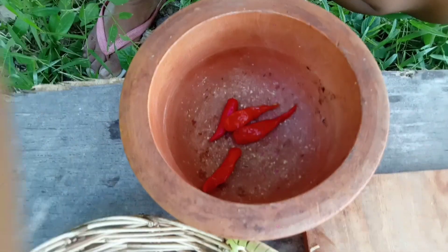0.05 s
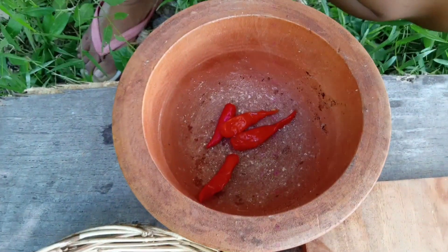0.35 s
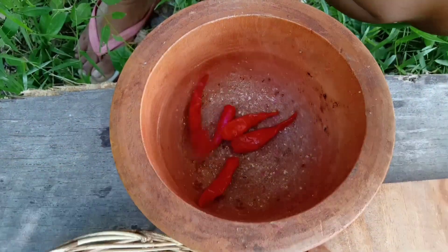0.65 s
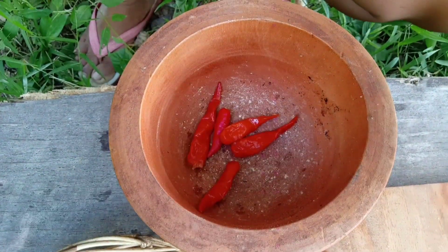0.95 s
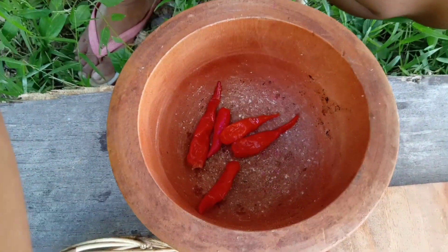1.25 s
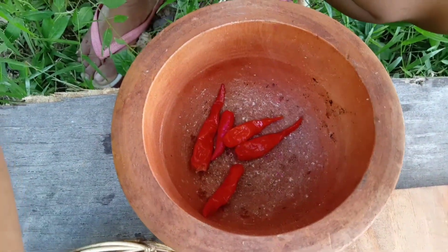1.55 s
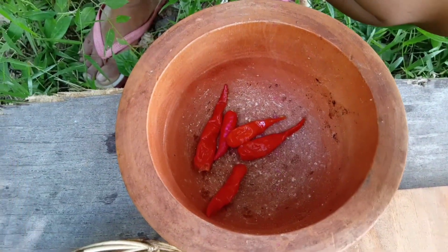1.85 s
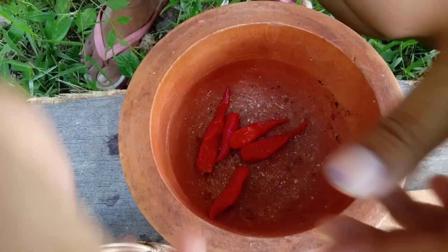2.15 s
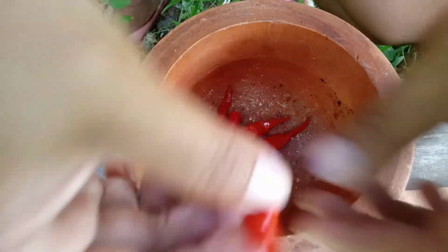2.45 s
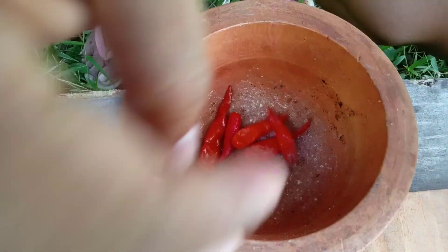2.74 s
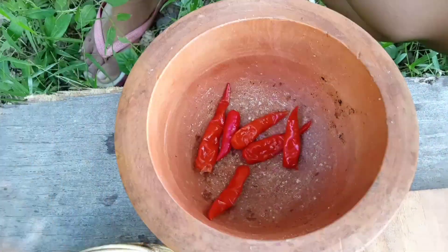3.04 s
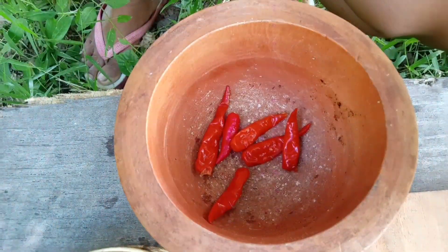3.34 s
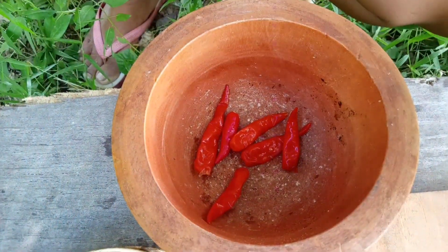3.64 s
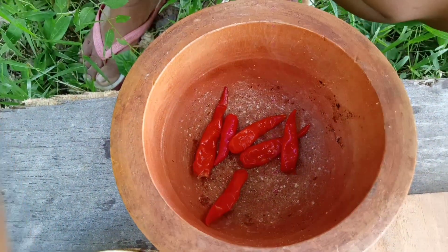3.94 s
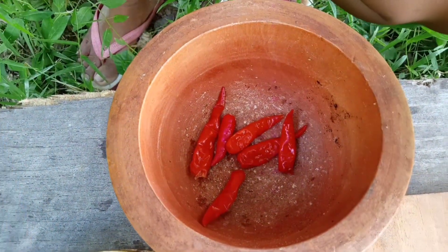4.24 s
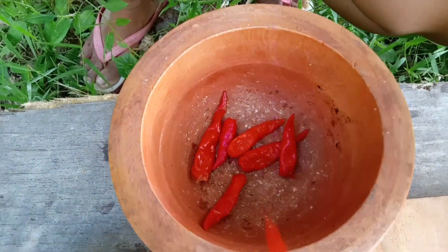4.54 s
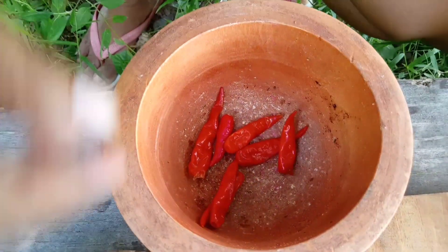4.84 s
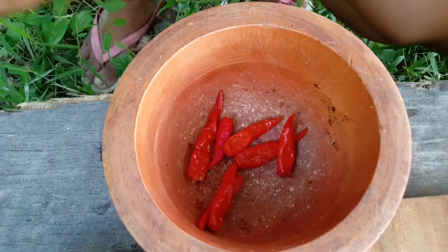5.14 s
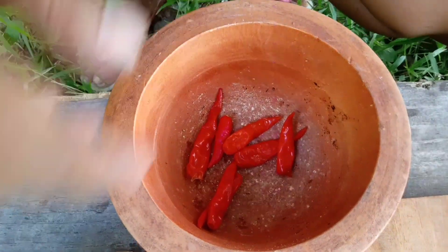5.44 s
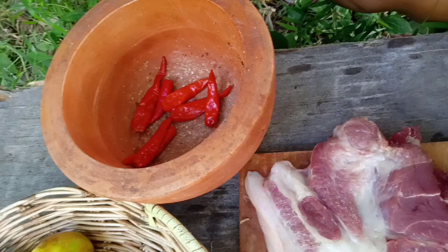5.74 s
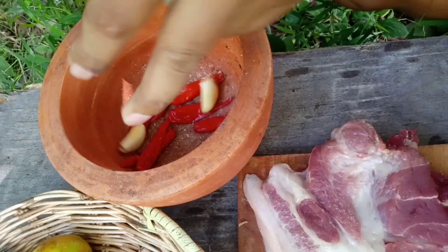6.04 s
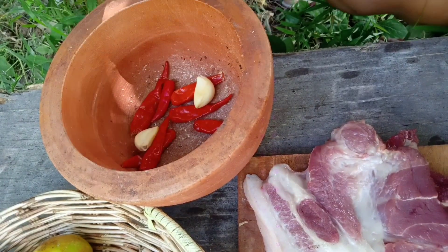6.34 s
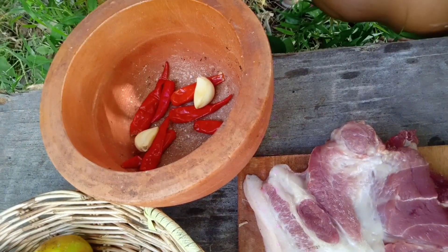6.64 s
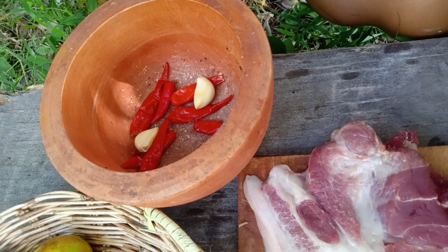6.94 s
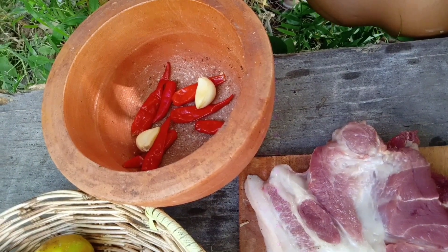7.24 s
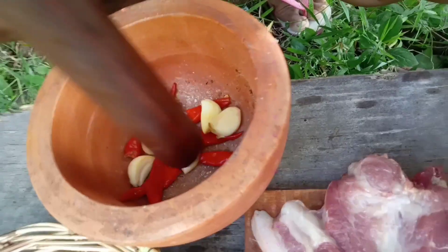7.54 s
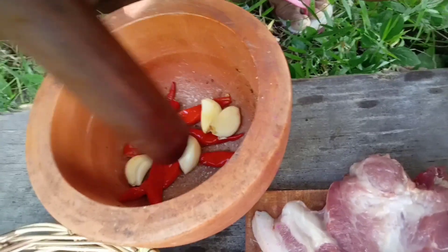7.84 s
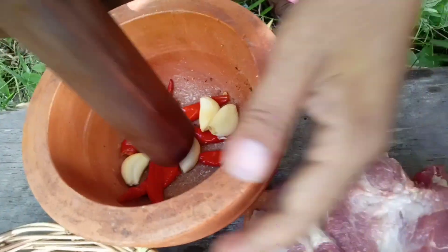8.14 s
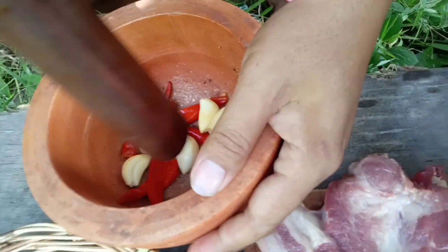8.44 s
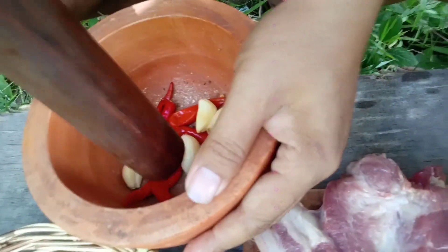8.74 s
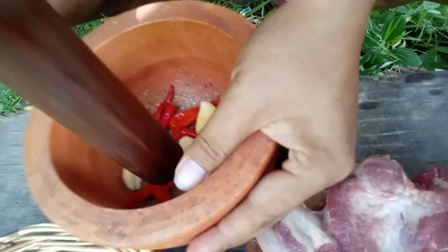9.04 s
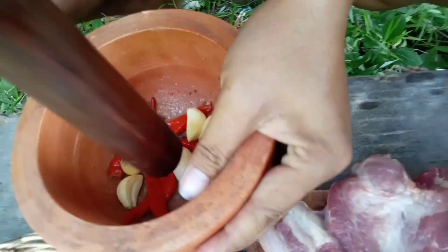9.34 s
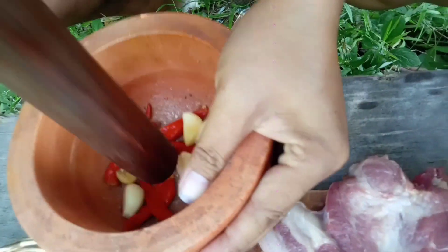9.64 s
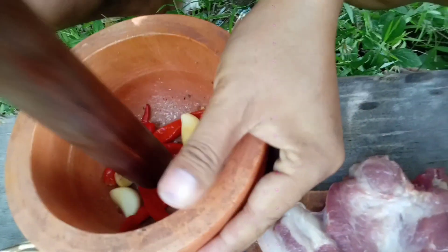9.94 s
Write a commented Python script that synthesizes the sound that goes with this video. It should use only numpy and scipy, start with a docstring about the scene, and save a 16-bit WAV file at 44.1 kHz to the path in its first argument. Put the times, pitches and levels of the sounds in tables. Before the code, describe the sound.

High, pulsing bird trills in a garden, a brief scrape and knock of a clay mortar, then close, regular pestle thumps.

```python
"""In a garden, chillies and garlic go into a clay mortar on a wooden bench. The mortar is dragged into
place, sticking and slipping, and a wooden pestle pounds the food: each blow makes the mortar boom and
the planks shake. Birds trill in double chirps, one whistles two notes twice, and others call far off,
over leaves and insects. Loud blows overload the close microphone, and its limiter (an automatic volume
control) turns the garden down for a moment."""
import sys
import numpy as np
from scipy import signal
from scipy.fft import rfft, irfft, next_fast_len
from scipy.io import wavfile
from scipy.ndimage import uniform_filter1d

SR = 44100
rng = np.random.default_rng(int(sys.argv[2]) if len(sys.argv) > 2 else 0)


def unload_audio(sound):
    """Save the sound as a 16-bit wav file, at the path given as the first command line argument."""
    columns = np.transpose(np.atleast_2d(sound))
    # keep every value between -1 and 1, then stretch to whole-number steps
    steps = np.round(np.clip(columns, -1, 1) * 32767)
    wavfile.write(sys.argv[1], SR, steps.astype(np.int16))


N = 440118
TIME = np.arange(N) / SR

# Modes, the tones a thing rings with when hit: pitch_hz, level_db, ring_s (time to fade by 60 dB)
BENCH_MODES = [(76, -12, 0.077), (100.9, 30, 0.12), (127, -6, 0.05)]
BOOM_MODES = [(155.6, 2, 0.11), (199, 4.5, 0.077), (247, -0.5, 0.067), (340, -8, 0.089),
              (412.6, -18, 0.098)]  # the mortar's hollow on its boards
KNOCK_MODES = [(567, -7, 0.037), (770, -1, 0.032), (880, -4, 0.025), (1151, -13, 0.034), (1344, -20, 0.019)]  # the mortar's hard knock
CLAY_MODES = [(1440, -10.5, 0.17), (2010, -31, 0.021), (2960, 12, 0.029), (3400, -3, 0.083)]  # the mortar's wall
# Noise colours, how strong the low and high parts are: pitch_hz, level_db
GARDEN_COLOUR = [(15, -43), (25, -7), (113, 4), (198, 1.5), (297, -4.5), (421, -11), (537, -12),
                 (1110, -14), (1900, -18.5), (3170, -15), (3440, -16), (5430, -30), (7300, -25),
                 (10600, -34), (15500, -20.5)]
CRACK_COLOUR = [(700, -2.5), (1200, -2), (2000, 1.5), (3000, 0), (4200, 0), (5500, -14), (8000, -14)]


def from_db(db):
    """Turn decibels into a number to multiply a sound by."""
    return 10 ** (np.asarray(db) / 20)


def unit_level(x):
    """Scale a sound so that its average level (rms) is 1."""
    return x / np.sqrt(np.mean(x ** 2) + 1e-20)


def in_time(rows, t=TIME):
    """Join the points of a table with straight lines; the first column is time."""
    times, *columns = np.transpose(rows)
    return [np.interp(t, times, column) for column in columns]


def add(out, start_s, sound):
    """Mix a sound in at its start time."""
    at = min(max(round(start_s * SR), 0), N)
    out[at:at + len(sound)] += sound[:N - at]


def fade(t, fade_in, fade_out):
    """A volume that rises, holds and falls; the fade lengths are in the same unit as t."""
    return np.clip(np.minimum(t / fade_in, (t[-1] - t) / fade_out), 0, 1)


def noise(colour, low_hz=20, high_hz=16500):
    """Steady noise of a given colour between a low and a high edge."""
    size = next_fast_len(N)
    hz = np.maximum(np.fft.rfftfreq(size, 1 / SR), 1)
    points_hz, db = np.transpose(colour)
    gain = from_db(np.interp(np.log(hz), np.log(points_hz), db))
    gain /= np.sqrt((1 + (low_hz / hz) ** 20) * (1 + (hz / high_hz) ** 20))
    return unit_level(irfft(rfft(rng.standard_normal(size)) * gain)[:N])


def tone(hz, waver, waver_hz):
    """A pure tone whose pitch wavers at random; waver is a share of the pitch."""
    wobble = np.interp(TIME[:len(hz)] * waver_hz, np.arange(SR // 20), rng.standard_normal(SR // 20))
    return np.sqrt(2) * np.sin(2 * np.pi * np.cumsum(hz * (1 + waver * wobble)) / SR)


def garden():
    """Five bands of noise swell slowly. From low to high: rumble, murmur, leaves, insects and hiss."""
    # How each band swells: time_s, level_db
    murmur_curve = [(0.0, -57), (1.55, -55), (1.75, -51), (2.11, -57), (4.81, -56.5), (5.37, -51.5),
                    (5.64, -58), (5.86, -48), (6.06, -52.5), (6.64, -55), (7.37, -48.5), (8.92, -49.5),
                    (9.09, -44.5), (9.98, -44.5)]
    leaf_curve = [(0.0, -55), (0.61, -54), (0.86, -51.5), (1.42, -51), (1.72, -48), (2.14, -56),
                  (4.75, -56.5), (5.31, -46), (5.58, -51.5), (6.87, -53), (7.06, -47.5), (7.37, -49),
                  (9.53, -47.5), (9.98, -48)]
    insect_curve = [(0.0, -58.5), (1.8, -54), (2.06, -59), (4.67, -59), (5.14, -53.5), (5.45, -53),
                    (5.61, -61), (5.86, -62.5), (6.06, -63.5), (6.75, -67), (7.09, -59), (8.26, -60),
                    (8.73, -59.5), (9.98, -57)]
    hiss_curve = [(0.0, -52.5), (1.88, -46.5), (2.14, -50), (3.57, -52.5), (5.4, -48.5), (5.58, -52),
                  (5.84, -51), (6.06, -50.5), (6.67, -54), (7.01, -50.5), (9.1, -50.5), (9.5, -52)]
    # Where the bands begin and end: edge_hz
    edges_hz = [20, 380, 1700, 5200, 11300, 16500]
    curves = murmur_curve, leaf_curve, insect_curve, hiss_curve
    murmur, leaves, insects, hiss = (in_time(curve)[0] for curve in curves)
    rumble = -42.5 + 0.85 * (murmur - murmur.mean())
    levels_db = [rumble, murmur + 2, leaves + 2, insects + 7.5, hiss + 4.5]
    bands = zip(levels_db, edges_hz, edges_hz[1:])
    return sum(from_db(db) * noise(GARDEN_COLOUR, low, high) for db, low, high in bands)


def insect():
    """One insect makes faint, high rasps that swell and fade."""
    # Rasps: start_s, length_s, level_db
    rasps = [(2.45, 0.22, -54), (2.883, 0.2, -53), (3.34, 0.21, -52), (3.83, .19, -52.5),
             (5.337, 0.19, -49)]
    level = np.zeros(N)
    for start_s, length_s, db in rasps:
        add(level, start_s, from_db(db) * np.hanning(int(length_s * SR)) ** .5)
    band = signal.butter(2, [10100, 10550], "band", fs=SR, output="sos")
    return level * unit_level(signal.sosfilt(band, rng.standard_normal(N)))


def among_trees(sound, echo_db, ring_s, count=300):
    """Trunks and leaves send back many small echoes, the later ones weaker."""
    delays_s = rng.uniform(.004, .45, count)
    echoes = np.zeros(SR // 2)
    echoes[(delays_s * SR).astype(int)] = rng.standard_normal(count) * from_db(-60 * delays_s / ring_s)
    return sound + from_db(echo_db) * signal.oaconvolve(sound, echoes / np.linalg.norm(echoes))[:N]


def far_calls():
    """Far birds sing thin or buzzy notes whose pitch bends in one arc."""
    # Calls: start_s, length_s, start_hz, middle_hz, end_hz, level_db, change_db, buzz (share of pitch)
    calls = [(0.771, 0.46, 4136, 3410, 3150, -36, -16.5, 0.011),
             (1.982, 0.1, 5900, 6620, 6750, -51.5, -3, 0.004),
             (2.299, 0.16, 5600, 6300, 7000, -55.5, -3, .005),
             (2.71, 0.18, 6450, 7520, 6500, -55.5, 7, 0.0038),
             (5.01, .32, 6280, 7600, 6760, -54, 7, 0.0061), (0.898, 0.046, 6500, 6120, 6000, -44, -6, .04),
             (3.658, 0.055, 6200, 5150, 2420, -39, -13, 0.027),
             (6.949, 0.03, 6400, 5700, 3500, -44.5, -1, .04),
             (8.679, 0.067, 7660, 7540, 7180, -31.5, 1, 0.038)]
    out = np.zeros(N)
    for start_s, length_s, start_hz, middle_hz, end_hz, db, change_db, buzz in calls:
        t = TIME[:int(length_s * SR)]
        arc = np.polyfit([0, .5, 1], [start_hz, middle_hz, end_hz], 2)
        level = from_db(db + change_db * t / length_s) * fade(t, 0.1 * length_s, .007)
        add(out, start_s, level * tone(np.polyval(arc, t / length_s), buzz, waver_hz=928))
    return out


def far_pips(every_s=.102, length_s=0.032, rise_share=0.145):
    """Far birds give short rising notes, alone or in even runs that grow louder."""
    # Runs: start_s, end_s, pitch_hz, level_db, swell_db_per_s
    runs = [(0.275, .82, 3087, -50, 20), (2.213, 2.25, 2960, -49, 0), (8.025, 8.06, 1967, -39.5, -3),
            (8.293, 8.33, 2110, -34, 0), (9.071, 9.53, 1868, -38, 20), (9.63, 9.655, 2120, -38, 0)]
    out, t = np.zeros(N), TIME[:int(length_s * SR)]
    for start_s, end_s, hz, db, swell in runs:
        for at_s in np.arange(start_s, end_s, every_s):
            note = tone(hz * (1 + rise_share * t / length_s), waver=0.048, waver_hz=392)
            add(out, at_s, from_db(db + swell * (at_s - start_s)) * fade(t, .007, .007) * note)
    return out


def trill(start_s, end_s, base_rate, base_hz, db, swell, fall_hz=378, chirp_s=0.0086):
    """A bird's pairs of falling chirps speed up, then slow down as it tires."""
    out = np.zeros(N)
    t = np.arange(0, end_s - start_s, 1 / SR)
    slow_start, tiring = 9.26 * np.exp(-t / .233), 3.76 * t
    pairs_per_s = base_rate - slow_start - tiring
    pairs_sung = np.cumsum(pairs_per_s) / SR
    pair_starts = np.searchsorted(pairs_sung, np.arange(pairs_sung[-1]))
    level_db = db + swell * t - 3.5 * np.exp(-np.minimum(t, t[-1] - t) / 0.048)  # softer at both ends
    for i in pair_starts[start_s + t[pair_starts] >= 0]:
        top_hz = base_hz + 28 * (pairs_per_s[i] - 23)  # a faster trill is also higher
        for delay_s, length_s, drop_hz in ((0, chirp_s, fall_hz), (0.011, chirp_s * 1.23, fall_hz * 0.7)):
            progress = np.linspace(0, 1, int(length_s * SR))
            pitch_chance, uneven_db = rng.standard_normal(2)
            hz = top_hz + 25 * pitch_chance - drop_hz * progress ** 1.87
            chirp = fade(progress, .17, .17) * np.sin(2 * np.pi * np.cumsum(hz) / SR)
            add(out, start_s + t[i] + delay_s, from_db(level_db[i] + uneven_db) * chirp)
    return out


def whistle(overtone_db=-40.5, waver=0.0081):
    """A bird whistles a falling and a rising note, twice, with a faint tone at three times the pitch."""
    # One list of points for each note: time_s, pitch_hz, level_db
    notes = [
        [(1.44, 2960, -37), (1.46, 2840, -21), (1.524, 2500, -31), (1.532, 2415, -23.5), (1.586, 2328, -24),
         (1.61, 2550, -28)],
        [(1.717, 2940, -37), (1.725, 2999, -31.5), (1.753, 3040, -17.5), (1.779, 3240, -24), (1.867, 3082, -14),
         (1.915, 3100, -30.5)],
        [(6.82, 2860, -44), (6.836, 2940, -29), (6.87, 2625, -19), (6.924, 2480, -15.5), (6.978, 2436, -15.5),
         (7.0, 2380, -35)],
        [(7.117, 2860, -38), (7.133, 2950, -22), (7.179, 3182, -11.5), (7.231, 3146, -10.5),
         (7.259, 3087, -17.5), (7.277, 3140, -23)],
    ]
    out = np.zeros(N)
    for note in notes:
        t = np.arange(note[0][0], note[-1][0], 1 / SR)
        hz, db = in_time(note, t)
        voice = tone(hz, waver, waver_hz=204.5) + from_db(overtone_db) * tone(3 * hz, waver, waver_hz=200)
        add(out, t[0], from_db(db) * fade(t - t[0], .007, .007) * voice)
    return out


def birds(cut_s=7.277):
    """Birdsong echoes among trees. At a cut, trills, whistles and their echoes end; far calls go on."""
    # Trills: start_s, end_s, base_pairs_per_s, base_pitch_hz, level_db, swell_db_per_s, echo_db
    bouts = [(-1.08, .255, 27, 5296, -34, 1, -7), (.511, 1.973, 27.14, 5296, -33, 1, -4),
             (2.378, 3.643, 26.69, 5296, -31, .3, -8), (3.856, 4.999, 27.27, 5296, -37.5, 6, -7),
             (5.68, 5.82, 28, 5330, -52, -50, 2), (5.68, 6.1, 22, 4850, -57, 8, 0),
             (6.28, 7.27, 26.5, 5300, -55, 10, 2), (6.62, 7.27, 22, 4850, -60, 7, 0)]
    trills = sum(among_trees(trill(*bout), echo_db, ring_s=.22) for *bout, echo_db in bouts)
    whistles = among_trees(whistle(), echo_db=-8.5, ring_s=0.46, count=120)
    calls = among_trees(far_calls(), echo_db=1.5, ring_s=0.48)
    pips = among_trees(far_pips(), echo_db=0, ring_s=0.45)
    before_cut = np.clip((cut_s - TIME) / 0.0023, 0, 1)
    return (from_db(-0.55) * trills + whistles) * before_cut + calls + from_db(-2) * pips


def struck(modes, contact_s, scatter_db=7.5, detune=0.015, ring_factor=1):
    """A short push sets a thing ringing, a little differently each time; longer pushes sound duller."""
    t = TIME[:SR // 5]
    ring = np.zeros(len(t))
    for k, (hz, db, ring_s) in enumerate(modes):
        level_chance, pitch_chance = rng.standard_normal(2)
        level = from_db(db + scatter_db * level_chance - 60 * t / (ring_s * ring_factor))
        ring += (-1) ** k * level * np.sin(2 * np.pi * hz * (1 + detune * pitch_chance) * t)
    push = np.sin(np.linspace(0, np.pi, max(int(contact_s * SR), 3)))
    ring = signal.fftconvolve(ring, push)[:len(t)]
    return ring / np.std(ring[:SR * 3 // 100])  # level 1 over the first 30 ms


def grainy(depth_db):
    """A volume that jumps from one millisecond to the next, as single fibres and grains break."""
    return from_db(depth_db * unit_level(uniform_filter1d(rng.standard_normal(N), size=40)))


def snaps(bursts, crack_db, fizz_db, clay_db, ring_s, grain_db, low_hz=300, rise_s=0.00035):
    """Bursts of tiny cracks die away quickly and set the clay wall ringing."""
    # The high fizz of a snap: pitch_hz, level_db
    fizz_colour = [(3500, -1), (5500, -2.5), (7600, 19.5), (10000, -7), (15000, -11.5)]
    level, clay = np.zeros((2, N))
    t = TIME[:SR // 6]
    for start_s, db in bursts:
        add(level, start_s, from_db(db - 60 * t / ring_s) * (1 - np.exp(-t / rise_s)))
        add(clay, start_s, from_db(db + clay_db) * struck(CLAY_MODES, contact_s=.0001, detune=0.00095))
    level *= grainy(grain_db)
    crack = from_db(crack_db) * noise(CRACK_COLOUR, low_hz)
    fizz = from_db(fizz_db) * noise(fizz_colour)
    return level * (crack + fizz) + clay


def blows(contacts, shudder_db, shudder_s, mash_db, mash_s=0.1):
    """Each contact thumps the bench and makes the mortar boom and knock; planks shudder, food mashes."""
    # Loose planks shuddering, and food being mashed: pitch_hz, level_db
    shudder_colour = [(50, -19), (90, -8), (160, 5), (230, 3.5), (320, -24), (450, -32), (800, -30),
                      (1500, -126)]
    mash_colour = [(250, -13), (450, 10.5), (800, 2), (1500, -5), (2600, -4), (4500, -31), (9000, -24)]
    out, shudder_power, mash_power = np.zeros((3, N))
    t = TIME[:SR // 2]
    for start_s, boom_db, bench_db, knock_db, ring_factor, contact_s in contacts:
        bench = struck(BENCH_MODES, contact_s=0.0058, scatter_db=13)
        boom = struck(BOOM_MODES, contact_s, scatter_db=4.5, detune=0.048, ring_factor=ring_factor)
        knock = struck(KNOCK_MODES, 0.00048, scatter_db=3.5, detune=0.029, ring_factor=ring_factor)
        for db, sound in (bench_db, bench), (boom_db, boom), (knock_db - 11, knock):
            add(out, start_s, from_db(db) * sound)
        shudder_level = from_db(boom_db + shudder_db - 60 * t / (shudder_s * ring_factor))
        mash_level = from_db(boom_db + mash_db - 60 * t / mash_s)
        add(shudder_power, start_s, shudder_level ** 2 * (1 - np.exp(-t / 0.0042)))
        add(mash_power, start_s, mash_level ** 2 * (1 - np.exp(-t / 0.0021)))
    shudder = np.sqrt(shudder_power) * noise(shudder_colour)
    mash = np.sqrt(mash_power) * noise(mash_colour) * grainy(depth_db=4)
    return out + shudder + mash


def handling():
    """The mortar is gripped, tipped and set down, garlic drops in, and food, grit and clay tick."""
    # Bumps: start_s, boom_db, bench_db, knock_db, clink_db, ring_factor, contact_s
    bumps = [(.681, -37, -53, -37, -62, 1.4, .001), (4.838, -24.5, -22.5, -68, -65, 4.4, 0.0069),
             (4.972, -10.5, -27, -31, -33.5, 1.3, 0.0059), (5.002, -32, -41, -34, -44, 6.6, 0.0017),
             (5.392, -12.5, -26, -12.5, -20.5, 1.5, 0.002), (5.404, -17, -33, -19, -31, 1.0, 0.0017),
             (5.436, -16, -23, -44, -23, 2.46, .0045), (5.585, -2, -35, -6.5, -18, 0.54, 0.00071),
             (5.604, -10, -39, -32, -42, 0.83, 0.00055), (5.636, -10, -35, -35, -26, 0.49, 0.0013),
             (5.876, -22.5, -62, -27.5, -43, 1.9, .0019), (5.976, -27, -57.5, -35, -52, 5, 0.003),
             (6.005, -26.5, -52, -20.5, -40, 2.4, 0.0012)]
    # Sharp, fizzy ticks and cracks of food, grit and clay: start_s, level_db
    ticks = [(0.3805, -30), (0.6494, -24), (0.6654, -10.5), (0.68, -6.5), (0.7764, -25), (1.2945, -28),
             (2.7736, -21), (3.0714, -31), (3.825, -21), (4.7142, -23.5), (5.436, -11.5), (5.8646, -26),
             (5.984, -24), (7.359, -8), (7.626, -14.5), (8.609, -11), (9.131, -22), (9.2219, -18),
             (9.864, -17)]
    contacts, clinks = [], []
    for start_s, boom_db, bench_db, knock_db, clink_db, ring_factor, contact_s in bumps:
        contacts.append((start_s, boom_db, bench_db, knock_db, ring_factor, contact_s))
        clinks.append((start_s, clink_db))
    return (blows(contacts, shudder_db=3, shudder_s=0.068, mash_db=-18.5)
            + snaps(clinks, crack_db=7.5, fizz_db=-4, clay_db=-5, ring_s=0.025, grain_db=4.5)
            + snaps(ticks, crack_db=-16, fizz_db=-10, clay_db=-45, ring_s=0.047, grain_db=2,
                    low_hz=1970, rise_s=0.00078))


def drag(slips_per_s=90):
    """The mortar's foot sticks and slips, grinding grit; each slip rings differently as contact moves."""
    # How hard the mortar is dragged: time_s, force_db
    force_curve = [(5.17, -38.5), (5.25, -18), (5.305, -13), (5.365, -15.5), (5.385, -53)]
    # Its foot scuffing the planks: pitch_hz, level_db
    scuff_colour = [(200, -16), (290, 0), (380, 7), (500, -7.5), (700, -10.5), (1100, -15), (2000, -54)]
    out, rub = np.zeros((2, N))
    burst = np.exp(-TIME[:SR // 20] / 0.0085)
    for start_s in np.arange(force_curve[0][0], force_curve[-1][0], 1 / slips_per_s):
        late_s, uneven_db = rng.standard_normal(2) * [0.2 / slips_per_s, 2.5]
        force = from_db(in_time(force_curve, start_s)[0] + uneven_db)
        boom = from_db(-3) * struck(BOOM_MODES, contact_s=0.00052, scatter_db=1, detune=0.057)
        bench = from_db(-17) * struck(BENCH_MODES, contact_s=0.0015)
        knock = from_db(-29) * struck(KNOCK_MODES, contact_s=0.00049, detune=0.11)
        clay = from_db(-27) * struck(CLAY_MODES, contact_s=.0001, detune=0.0055)
        add(out, start_s + late_s, force * (boom + bench + knock + clay))
        add(rub, start_s + late_s, force * burst)
    scuff = from_db(-2) * noise(scuff_colour)
    grit = from_db(-17.5) * noise(CRACK_COLOUR)
    return out + rub * (scuff + grit)


def pounding(bottom_s=0.01336, rock_s=.131, sway_db=-24.5, sway_s=3.9, ring_factor=0.94, contact_s=.0016):
    """The pestle bites the food, hits the bottom and bounces; the mortar rocks back, the planks sway."""
    # Strokes: start_s, force_db, weight_db (on the bench), crunch_db, bounce_after_s, bounce_db,
    # bounce_knock_db, rock_back_db
    strokes = [(7.34, -5, 0, -28, 0.031, -10, -26, -14),
               (7.626, -14.5, 8.5, -34.5, .045, -13.5, -20, -21.5),
               (7.958, -6.5, 0.5, -31, 0.039, -12, -21, -16),
               (8.257, -9, 5.5, -30.5, 0.043, -11.5, -27, -18),
               (8.582, -7, 7.5, -37, 0.028, -7, -14, -23.5), (8.898, -8.5, 7.5, -47, .022, -12, -34, -18.5),
               (9.221, -5.5, 6.5, -21.5, 0.067, -22, -42, -11.5), (9.546, -4, 5, -18.5, .035, -4, 5, -21),
               (9.861, -5, 4, -14, 0.032, -3.5, 7.5, -36)]
    # Light taps between strokes: start_s, force_db, knock_db
    taps = [(7.589, -14.5, -29), (7.691, -15.5, -45), (7.791, -21.5, -46), (8.212, -16, -36),
            (8.478, -23.5, -37), (9.186, -12.5, -25), (9.731, -7.5, -12.5)]
    hits, crunches = [], []  # a hit is start_s, boom_db, bench_db, knock_db
    sway_power = np.zeros(N)
    for start_s, force, weight, crunch, bounce_s, bounce, knock, rock in strokes:
        hits += [(start_s, force - 1, force + weight - 5, force - 20),
                 (start_s + bottom_s, force - 0.5, force + weight - 7, force - 6),
                 (start_s + bounce_s, bounce, bounce - 11, knock),
                 (start_s + rock_s, rock, rock - 13, rock - 21)]
        crunches += [(start_s, crunch), (start_s + bottom_s, force - 24),
                     (start_s + bounce_s, 1.04 * knock - 25)]
        add(sway_power, start_s, from_db(force + sway_db - 60 * TIME[:3 * SR] / sway_s) ** 2)
    for start_s, force, knock in taps:
        hits.append((start_s, force, force - 15, knock))
        crunches.append((start_s, knock - 22))
    contacts = [(*hit, ring_factor, contact_s) for hit in hits]
    return (blows(contacts, shudder_db=-5.5, shudder_s=0.37, mash_db=-16.5)
            + snaps(crunches, crack_db=2.5, fizz_db=-2, clay_db=-11, ring_s=0.033, grain_db=2.5,
                    rise_s=0.0013)
            + np.sqrt(sway_power) * noise(GARDEN_COLOUR, high_hz=352))


def scene():
    """The mortar close by and the garden around it, in one channel."""
    return (pounding() + handling() + drag() + birds() + insect() + garden())[None]


def record(dry, threshold_db=0.5, release_db_per_s=11.5, attack_s=0.0039, bass_hz=55, top_hz=15700):
    """The microphone loses deep bass, a limiter turns down after loud peaks, and the top is cut."""
    heard = signal.sosfilt(signal.butter(2, bass_hz, "high", fs=SR, output="sos"), dry)
    over_db = np.maximum(20 * np.log10(np.abs(heard[0]) + 1e-9) - threshold_db, 0)
    recovery_db = release_db_per_s * TIME
    held_db = np.maximum.accumulate(over_db + recovery_db) - recovery_db  # lets go slowly after a peak
    smoothing = np.exp(-1 / (attack_s * SR))
    limited = heard * from_db(-signal.lfilter([1 - smoothing], [1, -smoothing], held_db))
    clipped = limited / (1 + limited ** 8) ** (1 / 8)  # peaks that slip past are flattened
    return signal.sosfilt(signal.ellip(12, .1, 80, top_hz, fs=SR, output="sos"), clipped)


dry = scene()
out = record(dry)
unload_audio(out)
```